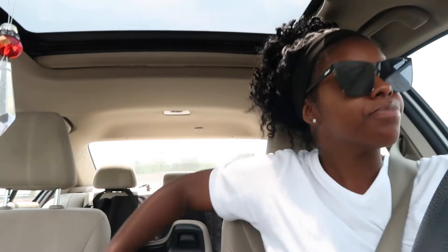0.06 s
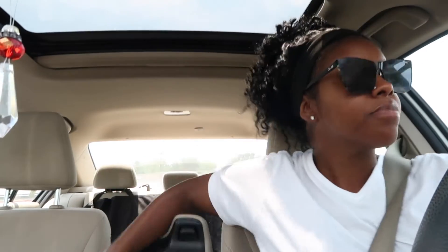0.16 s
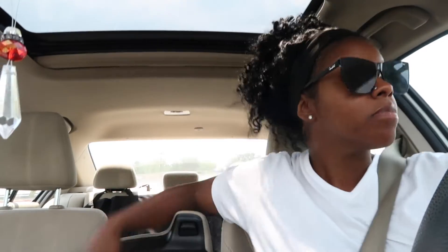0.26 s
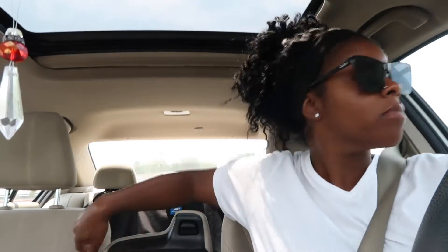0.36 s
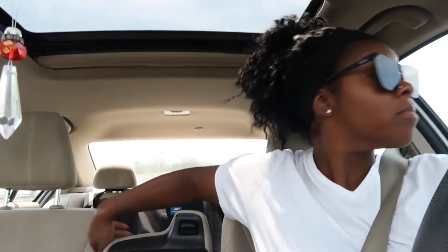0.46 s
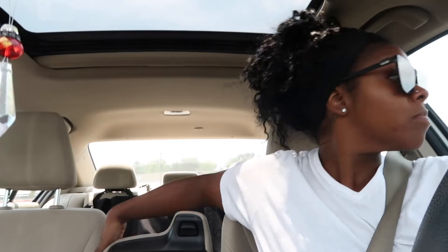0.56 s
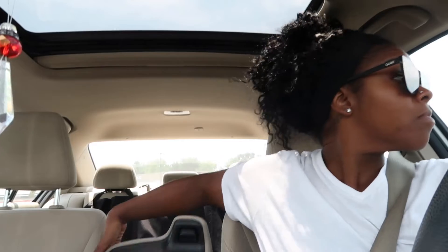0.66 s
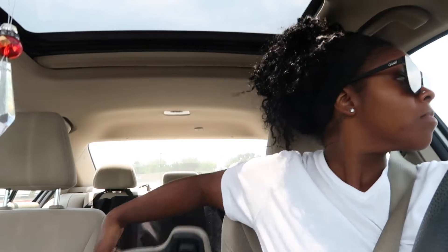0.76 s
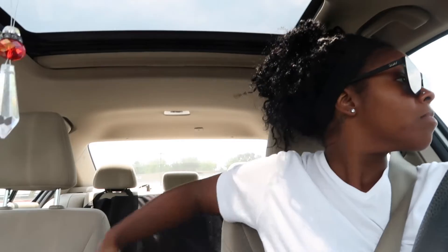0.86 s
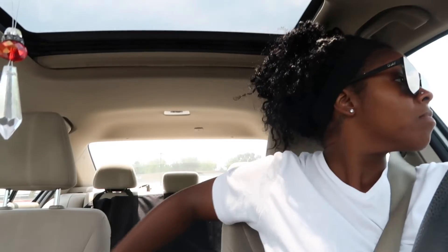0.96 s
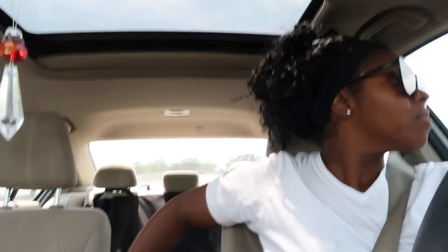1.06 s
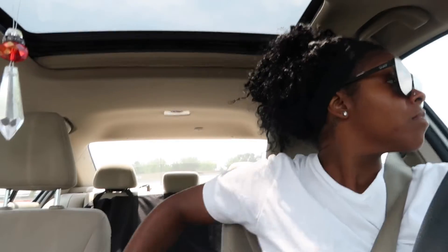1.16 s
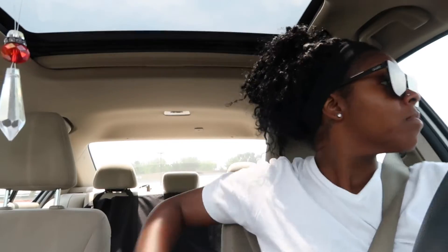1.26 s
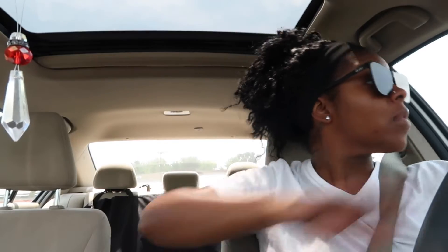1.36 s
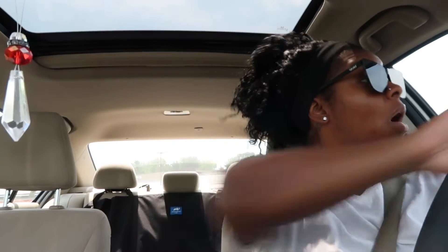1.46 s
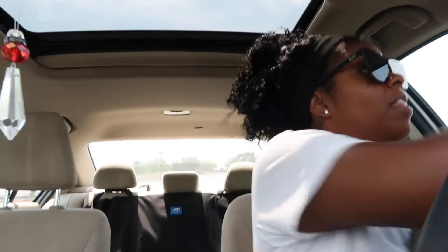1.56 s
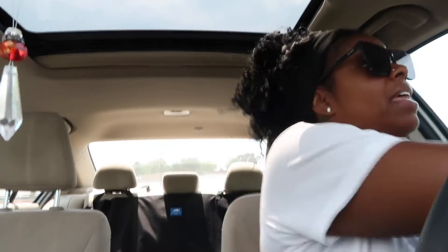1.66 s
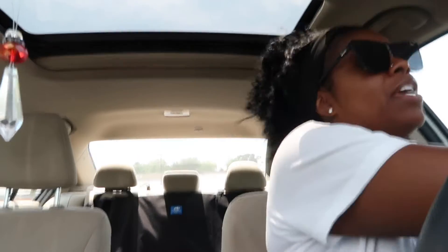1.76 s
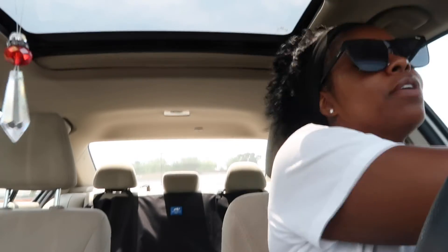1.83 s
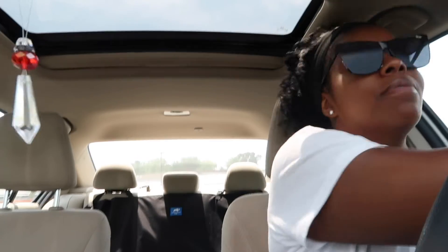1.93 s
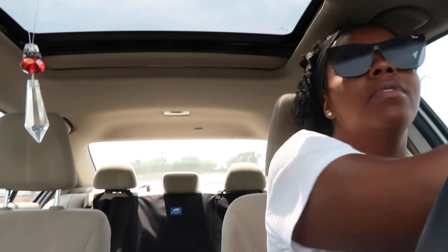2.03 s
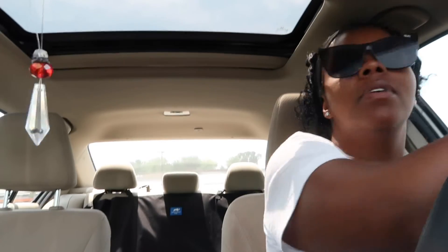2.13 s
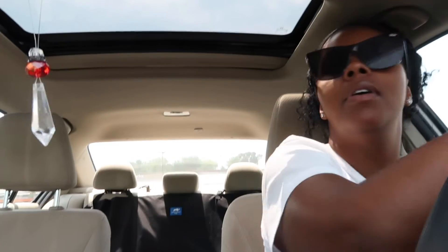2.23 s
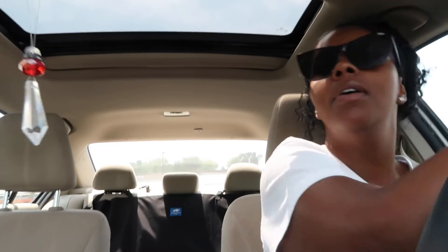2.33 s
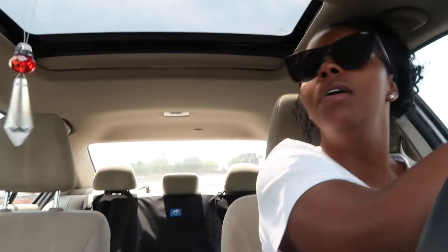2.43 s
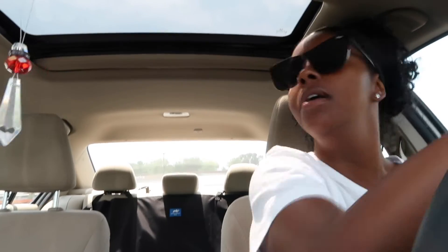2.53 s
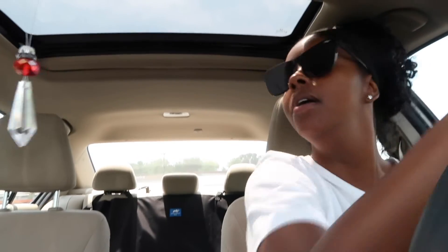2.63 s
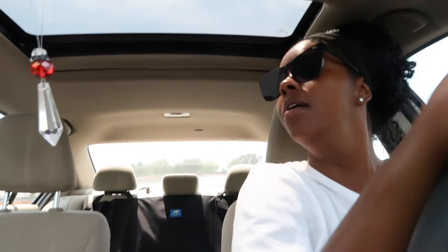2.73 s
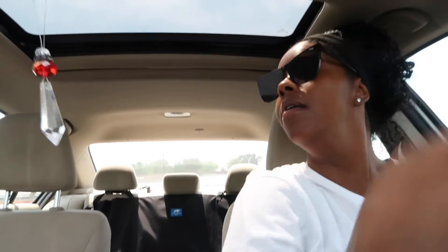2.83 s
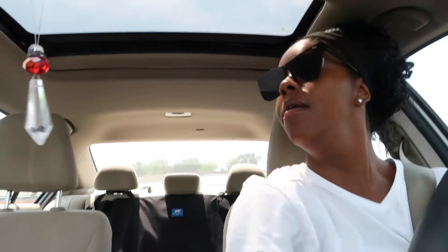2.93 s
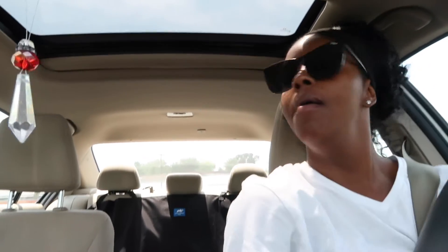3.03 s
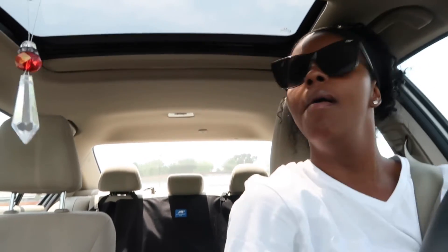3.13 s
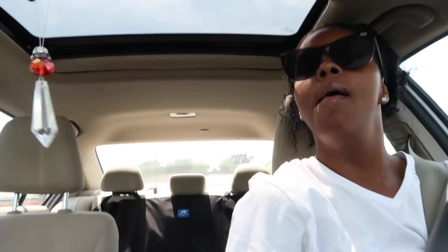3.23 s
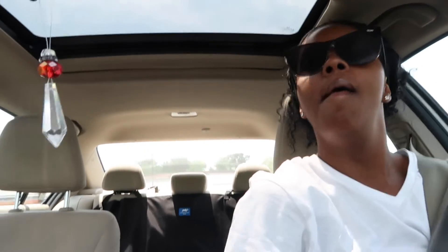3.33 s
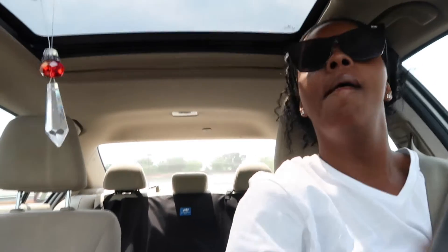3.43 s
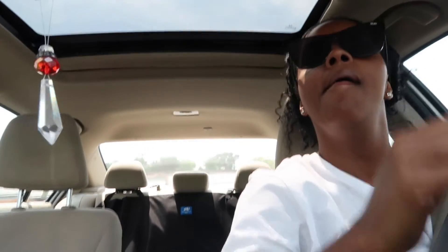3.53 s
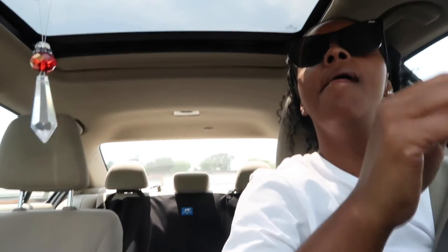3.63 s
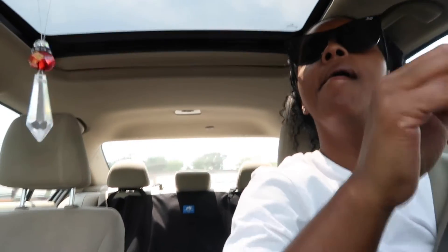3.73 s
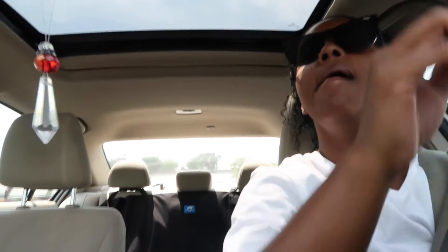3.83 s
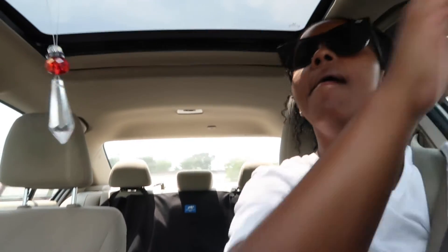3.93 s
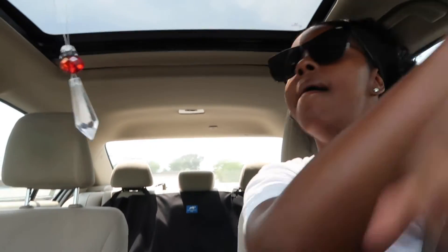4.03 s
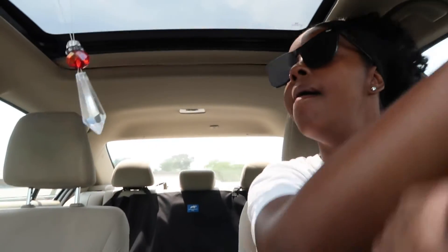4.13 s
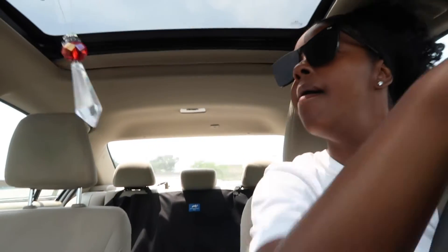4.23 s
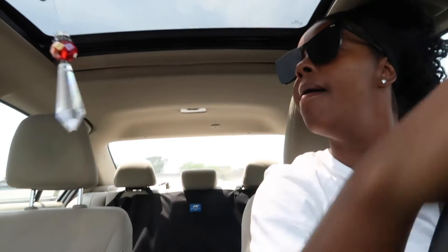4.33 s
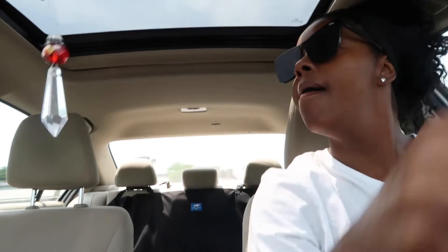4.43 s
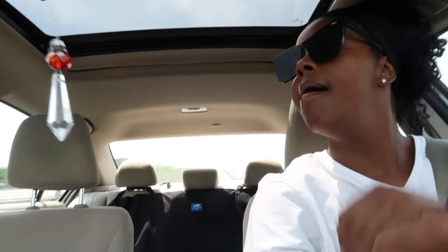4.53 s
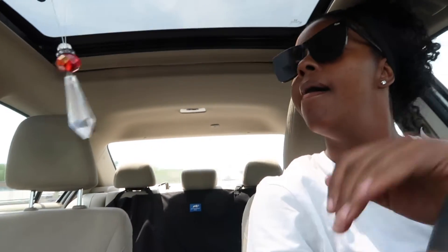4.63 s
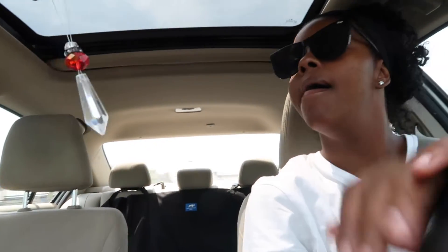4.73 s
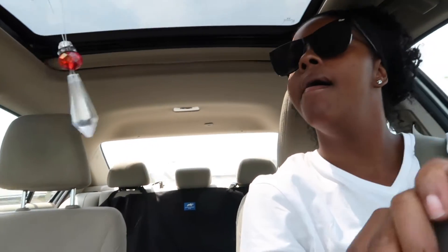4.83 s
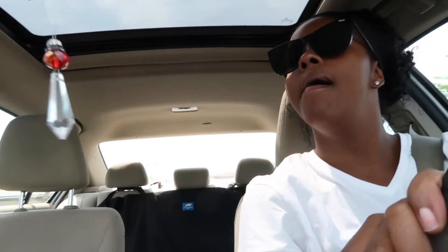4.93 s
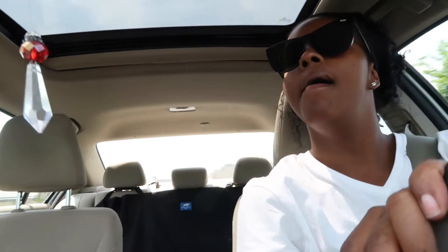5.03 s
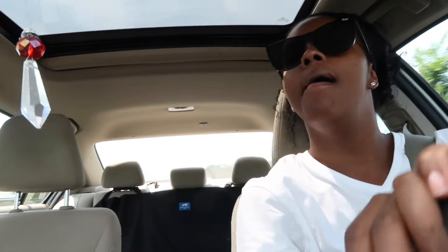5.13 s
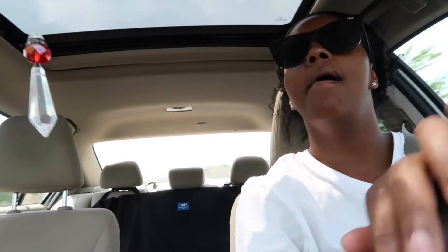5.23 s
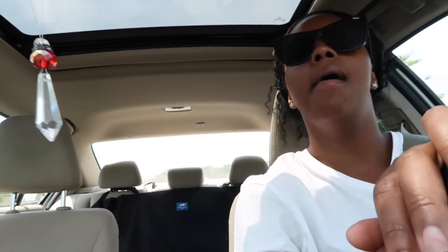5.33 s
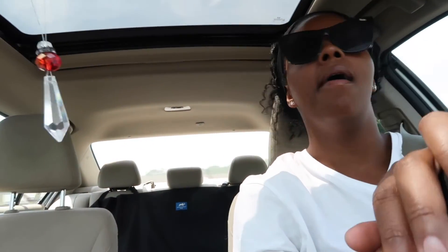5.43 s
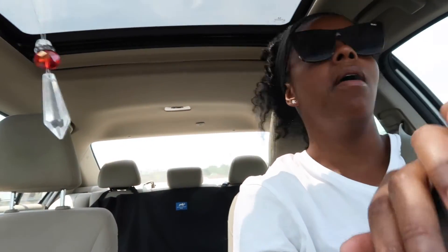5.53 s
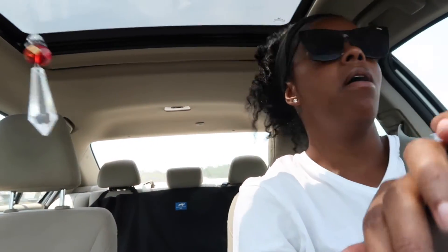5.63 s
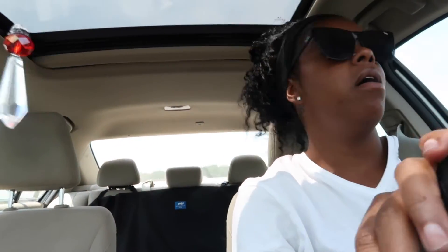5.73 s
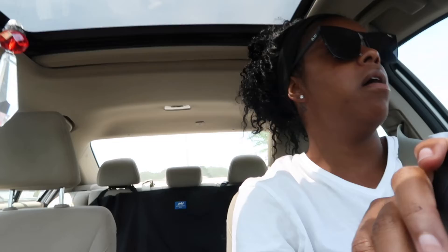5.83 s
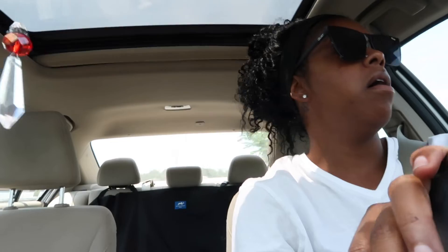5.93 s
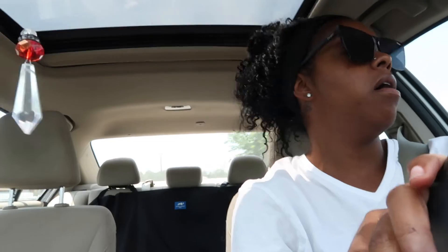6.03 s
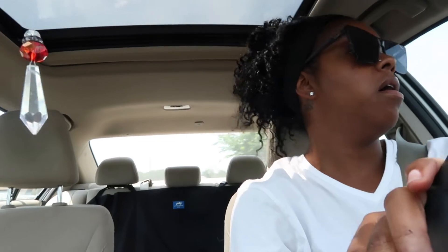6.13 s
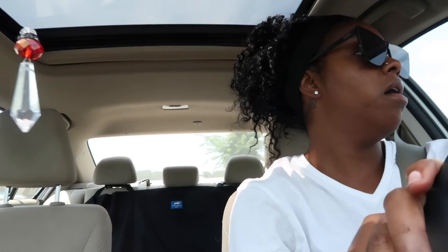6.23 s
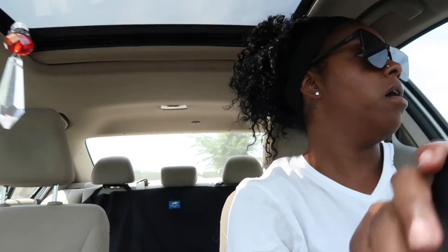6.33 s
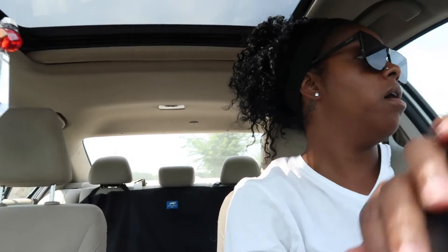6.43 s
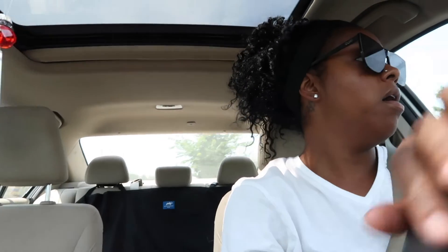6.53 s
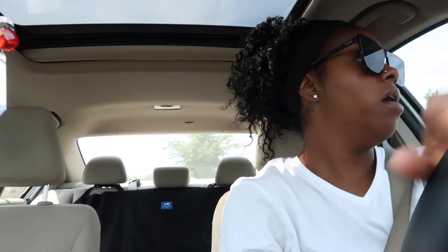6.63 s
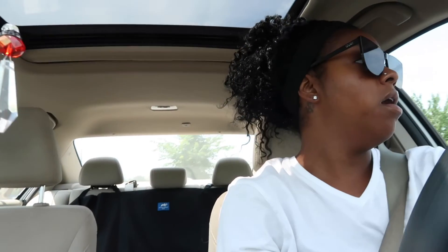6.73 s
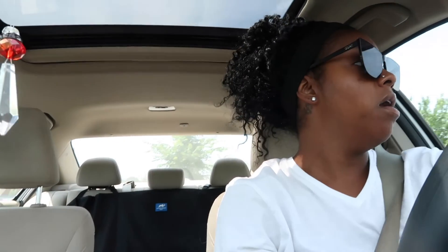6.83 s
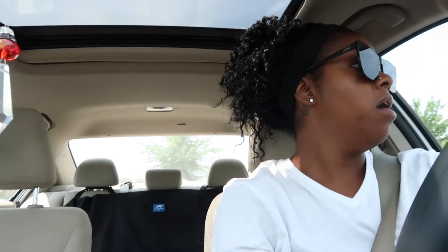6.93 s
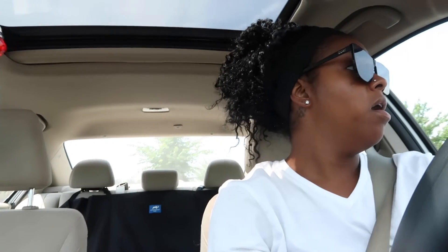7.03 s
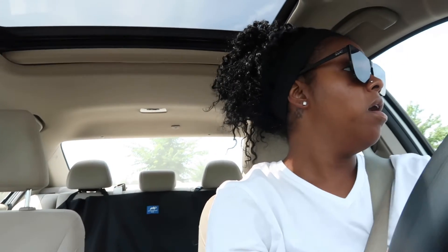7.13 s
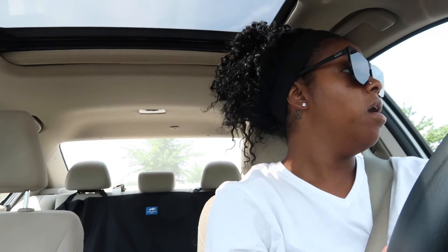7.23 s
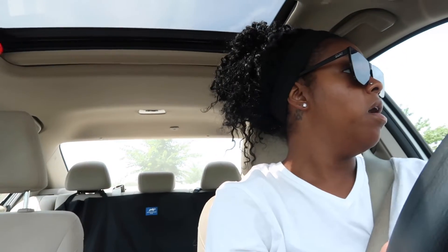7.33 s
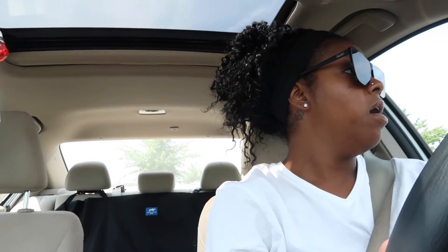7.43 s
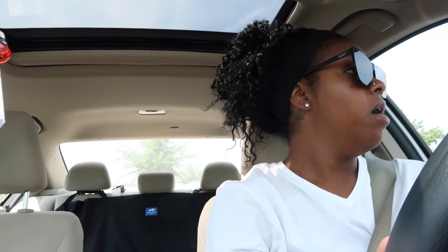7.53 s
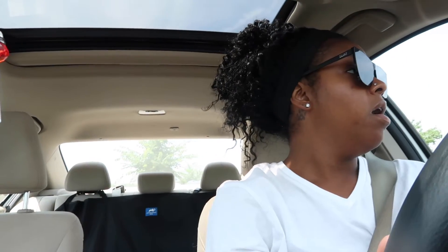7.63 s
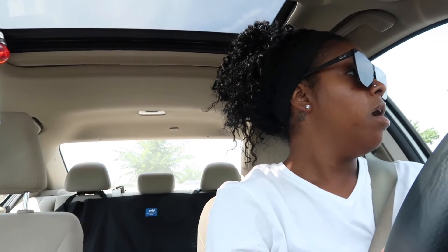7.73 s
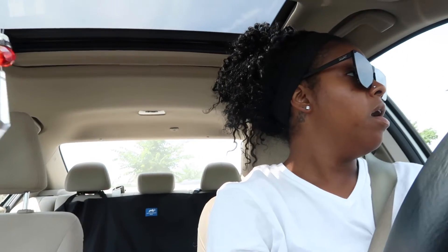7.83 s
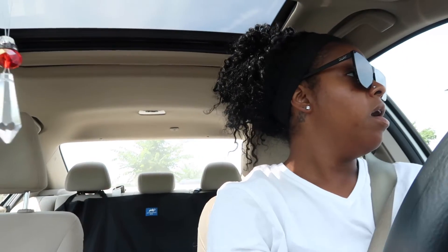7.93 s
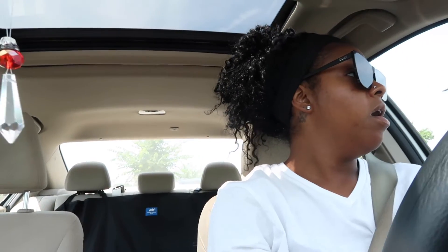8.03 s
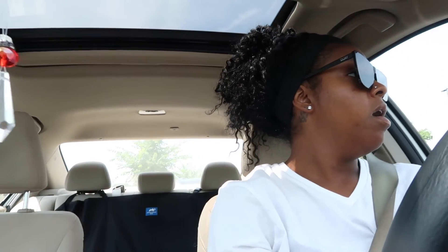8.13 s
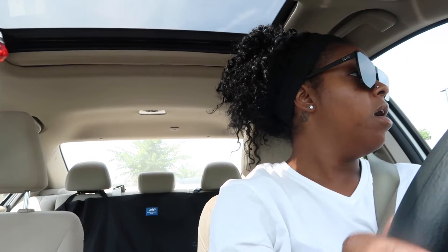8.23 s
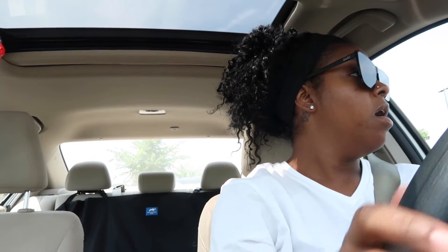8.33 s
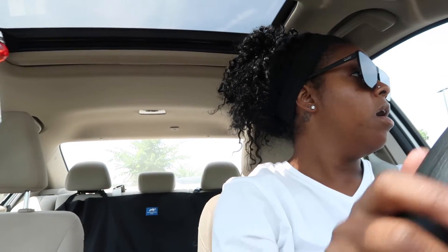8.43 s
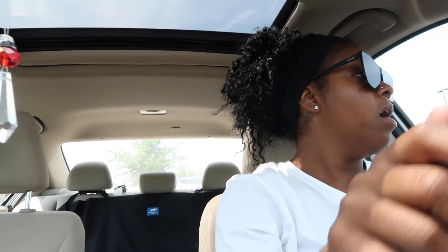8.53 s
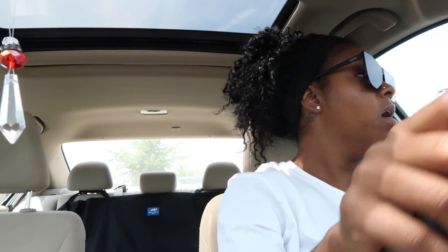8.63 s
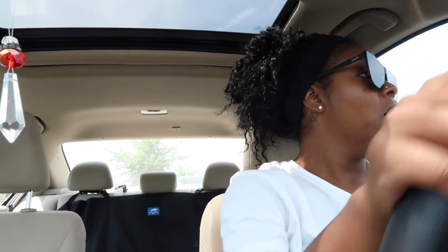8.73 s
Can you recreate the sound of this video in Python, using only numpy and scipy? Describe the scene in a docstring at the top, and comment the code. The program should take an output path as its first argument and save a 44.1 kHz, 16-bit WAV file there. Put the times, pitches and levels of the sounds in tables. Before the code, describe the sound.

Inside an idling car, plastic clacks and an indicator ticks; the gear lever clunks hard, the engine revs, the car rolls off and thumps twice.

```python
"""Inside a car: at idle, engine hum, fan and vent air sound beneath clacking plastic and a ticking relay.
After a second the gear lever clunks home and the automatic gain control ducks, recovering over two seconds.
The latch snaps, the engine speeds up past a faint squeak, and the car pulls away through a turn: the road
rumbles, the wheel slides through the hands and plastic clacks. The body then gives a double thump, the
indicator cancels and the car rolls on. Tones are summed sines; noises and blows are filtered random signals."""
import sys
import numpy as np
from scipy import signal
from scipy.fft import rfft, irfft, next_fast_len
from scipy.io import wavfile
from scipy.ndimage import uniform_filter1d

SR = 44100
rng = np.random.default_rng(int(sys.argv[2]) if len(sys.argv) > 2 else 0)


def persist_wave(psi):
    """Save psi, clipped to +-1, as 16-bit WAV."""
    counts = np.round(np.clip(psi, -1, 1) * 32767).astype(np.int16)
    wavfile.write(sys.argv[1], SR, np.atleast_2d(counts).T)


N = 386757
TIME = np.arange(N) / SR
AFTER = np.arange(SR // 4) / SR   # time since a blow, in seconds
MID_ONLY = np.array([[1], [0]])   # places a sound in the centre


def from_db(db):
    """Logarithmic level: 20 dB is a tenfold amplitude."""
    return 10 ** (np.asarray(db) / 20)


def in_time(rows):
    """Linear interpolation: each column of a curve at every sample."""
    s, *columns = np.transpose(rows)
    return [np.interp(TIME, s, c) for c in columns]


def drift(per_s):
    """Random modulation: normal random values, per_s of them a second, joined by straight lines."""
    knots = rng.standard_normal(2000)
    return np.interp(TIME * per_s, np.arange(len(knots)), knots)


def dying(t60):
    """Exponential decay: damping takes 60 dB off in t60 seconds."""
    return from_db(-60 * AFTER / max(t60, 1e-3))


def add(out, s, sound):
    """Superposition: mix a sound in from time s."""
    at = max(round(s * SR), 0)
    out[:, at:at + sound.shape[1]] += sound[:, :max(N - at, 0)]


def colour(x, spectrum, resonances=()):
    """Minimum-phase filtering: the folded cepstrum makes a spectrum with its resonances causal."""
    size = 2 * next_fast_len(x.shape[-1] // 2 + 1024)
    hz = np.arange(size // 2 + 1) * SR / size + 0.00091   # keeps the logarithm finite
    points, levels = np.transpose(spectrum)
    db = np.interp(np.log(hz), np.log(points), levels)
    for centre, width, height in resonances:
        db = db + height / (1 + (2 * (hz - centre) / width) ** 2)
    cepstrum = irfft(np.log(from_db(db)))[:size // 2]
    cepstrum[1:] *= 2
    response = np.exp(rfft(cepstrum, size))
    return irfft(rfft(x, size) * response)[..., :x.shape[-1]]


def band(x, edges_hz, kind):
    """Recursive filtering: a steep Butterworth passes one band."""
    return signal.sosfilt(signal.butter(4, edges_hz, kind, fs=SR, output="sos"), x)


# Cabin resonances in every steady noise. Each row: centre in Hz, width in Hz, height in dB.
CABIN_RESONANCES = [(466, 73, 4), (656, 63, 4.5), (824, 130, 1), (2450, 670, 1.5), (3770, 440, 3.5),
                    (4740, 78, 5.5), (5430, 280, -2), (6500, 400, 1.5)]
# Stereo width of diffuse sound. Each row: frequency in Hz, side filter gain in dB.
DIFFUSE_WIDTH = [(30, -65.5), (125, -32.5), (300, -10), (700, -12.5), (1400, -4), (4500, -1.5),
                 (6300, -3.5), (8000, 3.5), (10500, 2), (12500, 19), (15000, 4)]


def noise(spectrum, resonances=()):
    """Diffuse field: independent noises fill mid and side, the mid at unit rms."""
    mid, side = colour(rng.standard_normal((2, N)), spectrum, [*CABIN_RESONANCES, *resonances])
    return np.array([mid, colour(side, DIFFUSE_WIDTH)]) / mid.std()


# Stereo width of nearby sound. Each row: frequency in Hz, side filter gain in dB.
NEARBY_WIDTH = [(60, -42.5), (250, -28.5), (1000, -14), (2300, -13), (3600, -7), (4700, 0.5), (6300, -4),
                (8000, 8), (10000, 7.5), (12500, 14), (15500, 7)]


def reflections(direct, t60, tail_db, tail_t60, rise_s):
    """Impulse response, as mid and side: a direct click, echoes off the glass that build up, a tail."""
    build_up = 1 - np.exp(-AFTER / max(rise_s, 1e-4))
    decay = dying(t60) + from_db(tail_db) * dying(tail_t60)
    echoes = rng.standard_normal((2, len(AFTER))) * build_up * decay
    echoes /= np.sqrt(np.sum(echoes[0] ** 2))
    echoes[0, round(max(rise_s, 0) * SR)] += direct
    side = colour(echoes[1], NEARBY_WIDTH) * np.hypot(1, direct)
    return np.array([echoes[0], side])


def at_level(sound, db):
    """Level of an onset: the mid's first 20 ms are scaled to the given rms in dB."""
    return sound * from_db(db) / np.sqrt(np.mean(sound[0, :SR // 50] ** 2) + 1e-20)


def blows(rows, spectrum, resonances, ring_width, thud_db, crest_db, snap_db, **echo):
    """Impact excitation: weight sets the thud, hardness the snap, the spot struck the ring."""
    out = np.zeros((2, N))
    for s, peak, thud, snap, ring_hz, ring_db in rows:
        spot = (ring_hz, ring_width * ring_hz, ring_db)
        hit = colour(reflections(**echo), spectrum, [*resonances, spot])
        add(out, s, at_level(band(hit, 830, "low"), thud + thud_db))
        add(out, s, at_level(band(hit, [830, 4600], "band"), peak - crest_db))
        add(out, s, at_level(band(hit, 5200, "high"), snap + snap_db))
    return out


def small_click(modes, **echo):
    """Modal synthesis: a small sprung part rings in its modes, convolved with the cabin's echoes."""
    ring = 0
    for k, (hz, t60, db) in enumerate(modes):
        ring = ring + (-1) ** k * from_db(db) * dying(t60) * np.sin(2 * np.pi * hz * AFTER)
    return signal.fftconvolve(reflections(**echo), ring[None], axes=1)


# Fan. Each row: time in seconds, fundamental in Hz, level in dB before the harmonics' own.
FAN = [(0, 176.5, -37.5), (2.4, 177.3, -40.5), (3.5, 169.9, -39.5), (6, 177, -45), (8.77, 175.6, -46)]
# Its harmonics. Each row: multiple of the fundamental, relative level in dB.
FAN_TONES = [(1, -2.5), (2, -9.5), (3, -16)]


def fan():
    """Harmonic series: the blower hums on whole multiples of a slightly unsteady frequency."""
    hz, level_db = in_time(FAN)
    phase = 2 * np.pi * np.cumsum(hz) / SR + 0.67 * drift(4.2)
    hum = sum(from_db(db) * np.sin(round(k) * phase) for k, db in FAN_TONES)
    return np.sqrt(2) * from_db(level_db) * hum * MID_ONLY


# Surges of rumble over uneven spots. Each row: start in seconds, peak level in dB.
JOLTS = [(2.36, -32), (3.17, -28), (3.29, -24), (4.13, -24), (4.27, -23), (4.79, -20.5), (5.02, -21),
         (5.21, -16.5), (5.3, -26), (6.17, -28), (6.49, -22.5), (6.78, -28.5), (7.25, -28.5)]
JOLT_S = 0.035   # time a surge takes to peak


def surges():
    """Critically damped response: rumble swells quickly after each uneven spot, then dies away."""
    total = 0
    for s, db in JOLTS:
        age = np.maximum(TIME - s, 0) / JOLT_S
        total = total + from_db(db) * age * np.exp(1 - age)
    return total


# The ride. Each row: time in seconds, body rumble and tyre roar as relative levels in dB.
RIDE = [(0, -29, -36.5), (0.6, -34.5, -37.5), (1.1, -27, -35), (1.5, -28, -38.5), (2.15, -34.5, -33.5),
        (2.45, -20.5, -38.5), (2.9, -38, -36.5), (3.3, -27.5, -36.5), (4.2, -18, -35), (5.3, -18.5, -37),
        (5.6, -23.5, -36.5), (6.1, -22, -38.5), (6.6, -27, -38), (7.0, -31, -39), (8.77, -37.5, -39.5)]
# Spectra of rumble, tyres, vent air and hiss. Each row: frequency in Hz, relative density in dB per Hz.
RUMBLE = [(18, -38.5), (28, -12), (40, 10), (55, 3.5), (76, 10), (95, 3.5), (115, -7.5), (150, -12.5),
          (220, -19.5), (400, -78.5)]
TYRES = [(76, -25), (130, 3.5), (156, -9.5), (221, -7), (295, -12.5), (334, -13), (442, -16.5), (601, -20),
         (675, -27.5), (1300, -32.5), (1690, -49), (2860, -120)]
AIR = [(410, -28), (700, 4), (1140, -14), (1490, -8), (3230, -19.5), (4770, -27), (5660, -36), (6800, -39),
       (13000, -65.5)]
HISS = [(1060, -31), (2230, -6), (4400, -3.5), (6340, -4), (8730, -10.5), (10600, -13), (13000, -26.5),
        (15000, -42)]
VENT_DB, VENT_FOLLOWS = -52.5, 0.82   # air noise at the mean tyre roar; share of the roar's swing in dB
HISS_DB = -64.5


def road_and_vents(rumble_db, tyres_db, flicker_db):
    """Broadband noise: the ride drives rumble and roar; the air partly follows the roar, over a faint hiss."""
    rumble, tyres = in_time(RIDE)
    rumble_gain = np.hypot(from_db(rumble + rumble_db), surges())
    tyre_gain = from_db(tyres + tyres_db + flicker_db * drift(14))
    road = rumble_gain * noise(RUMBLE) + tyre_gain * noise(TYRES)
    vent_gain = from_db(VENT_DB + VENT_FOLLOWS * (tyres - tyres.mean()))
    return road + vent_gain * noise(AIR) + from_db(HISS_DB) * noise(HISS)


# Speed of the four-cylinder engine. Each row: time in seconds, firings per second.
ENGINE = [(0, 24.2), (1.55, 24.4), (1.75, 28), (1.92, 41), (2.15, 44.5), (2.4, 39), (2.75, 33.6),
          (3.1, 31.6), (3.45, 32.3), (4.0, 36.4), (4.3, 35.5), (4.8, 33), (5.3, 34), (5.9, 31), (6.4, 26.4),
          (6.9, 24), (7.5, 24), (8.1, 25.2), (8.77, 25.4)]
# Load on the engine. Each row: time in seconds, load from 0 at idle to about 1 when pulling.
THROTTLE = [(0, 0.12), (1.6, 0), (2.0, 0.84), (2.5, 0.84), (3.05, 0.87), (3.6, 1.03), (4.4, 0.42),
            (5.4, 0.44), (6.0, 0.66), (6.6, 0.036), (8.77, 0.25)]
# Strength of the overtones. Each row: multiple of the firing rate, relative level in dB.
ORDER_DB = [(2, 0.5), (3, 1), (4, -5), (5, 0), (7, -2.5)]
# How the cabin passes the overtones. Each row: frequency in Hz, gain in dB.
BOOM = [(48, -6.5), (73, -4.5), (86, -1.5), (97, 0.5), (108, -8.5), (122, -1), (133, -13), (148, -20),
        (165, -17.5), (200, -17.5), (245, -18.5), (300, -28), (450, -23.5)]
FIRING_DB, FIRING_LOAD_DB = -34.5, 0.5   # each pair: level at idle, gain at load 1
OVERTONES_DB, OVERTONES_LOAD_DB = -39, 11.5
BELT_DB, BELT_LOAD_DB = -54, 9.5
BELT_RATIO = 6.2   # hum of a belt-driven pulley, in cycles per firing


def engine(rough):
    """Source and resonator: firing tone, pulley hum and overtones that glide through cabin resonances."""
    rate, = in_time(ENGINE)
    load, = in_time(THROTTLE)
    phase = 2 * np.pi * np.cumsum(rate) / SR
    hum = from_db(FIRING_DB + FIRING_LOAD_DB * load) * np.sin(phase)
    hum += from_db(BELT_DB + BELT_LOAD_DB * load) * np.sin(BELT_RATIO * phase)
    for k in range(2, 14):
        db = OVERTONES_DB + OVERTONES_LOAD_DB * load
        db = db + np.interp(k, *np.transpose(ORDER_DB)) + np.interp(k * rate, *np.transpose(BOOM))
        unsteady_gain = from_db(db) * (1 + rough * drift(8.4))
        hum += unsteady_gain * np.sin(k * phase + rng.uniform(0, 2 * np.pi) + rough * drift(3.7))
    return np.sqrt(2) * hum * MID_ONLY


SLIPS_PER_S, SLIP_SPREAD_DB = 700, 2.5   # mean rate; scale of the random sizes


def crackle(spectrum):
    """Stick-slip friction: tiny random slips of uneven size, with cabin echoes, the mid at unit rms."""
    sizes = from_db(SLIP_SPREAD_DB * np.minimum(rng.exponential(1, N), 3)) * rng.choice([-1, 1], N)
    slips = sizes * (rng.random(N) < SLIPS_PER_S / SR)
    echoes = reflections(direct=0.86, t60=0.057, tail_db=-24, tail_t60=0.1, rise_s=0.001005)
    echoing = signal.fftconvolve(slips[None], echoes, axes=1)[:, :N]
    sound = colour(echoing, spectrum, CABIN_RESONANCES)
    return sound / sound[0].std()


# The wheel slides through the hands. Each row: start in seconds, length in seconds, relative level in dB.
SLIDES = [(0.0, 0.26, -64), (0.6, 0.63, -64), (2.11, 0.13, -48), (2.847, 0.14, -54), (4.05, 0.38, -60),
          (5.198, 0.74, -52), (5.922, 0.44, -57), (6.538, 0.8, -56), (7.403, 0.56, -63.5)]
# Brief rubs of skin and cloth. Each row: centre in seconds, length in seconds, relative level in dB,
# share of the power on the wheel's rim from 0 to 1.
RUBS = [(0.21, 0.048, -38, 0.07), (0.684, 0.088, -43, 0.36), (1.622, 0.21, -48.5, 0.05),
        (1.878, 0.035, -48.5, 0.7), (2.13, 0.09, -44, 0), (2.449, 0.1, -47.5, 0.8),
        (3.974, 0.063, -42, 0.28), (4.112, 0.12, -41.5, 0.02), (4.25, 0.14, -44.5, 0.1),
        (4.523, .035, -48, 0), (8.345, 0.032, -54.5, 1), (8.458, 0.086, -47, 1)]
# Spectra of sliding palms and of rubbed cloth. Each row: frequency in Hz, relative level in dB.
PALM = [(1060, -34.5), (1800, -5), (2230, -1), (4290, -8), (4690, -5), (6340, -3), (8730, -14), (10600, -9),
        (12700, -31), (13400, -20.5), (13700, -33.5), (15000, -52.5)]
CLOTH = [(600, 16.5), (1500, 8), (2800, 9.5), (3700, 2), (4300, 2.5), (4800, -5), (5600, 3.5), (7200, -4),
         (8700, -16), (10500, -9), (13000, -65)]
# Resonances of skin on the rim. Each row: centre in Hz, width in Hz, height in dB.
RIM = [(2580, 120, 4), (3480, 300, 10), (4840, 500, 15), (7240, 1200, 10), (10000, 1200, 11)]
GRIP_S, LET_GO_S = 0.14, 0.096   # a slide's linear swell; time constant of its fade


def hands(slide_db, rub_db, grain_db):
    """Friction noise: the wheel hisses through the palms; short rubs crackle on cloth or ring on the rim."""
    slide = 0
    for s, length, db in SLIDES:
        swell = np.clip((TIME - s) / GRIP_S, 0, 1)
        fade = np.exp(-np.maximum(TIME - s - length, 0) / LET_GO_S)
        slide = slide + from_db(db) * swell * fade
    cloth, rim = crackle(CLOTH), noise(CLOTH, RIM)
    rubs = 0
    for s, length, db, share in RUBS:
        share = np.clip(share, 0, 1)
        stroke = from_db(db) * np.exp(-(2 * (TIME - s) / length) ** 2)
        rubs = rubs + stroke * (np.sqrt(1 - share) * cloth + np.sqrt(share) * rim)
    return slide * from_db(slide_db) * noise(PALM) + rubs * from_db(rub_db + grain_db * drift(170))


# A faint rising squeak. Each row: time in seconds, mean frequency in Hz, level in dB.
SQUEAK = [(1.73, 2150, -65), (1.75, 2300, -51), (1.785, 2680, -56), (1.81, 2850, -63)]


def squeak(waver):
    """Frequency modulation: a thin rising tone wavers at random."""
    hz, db = in_time(SQUEAK)
    sounding = (TIME > SQUEAK[0][0]) & (TIME < SQUEAK[-1][0])
    phase = 2 * np.pi * np.cumsum(hz * (1 + waver * drift(280))) / SR
    return sounding * from_db(db) * np.sin(phase) * MID_ONLY


# Small hard parts. Each row: start in seconds, frequency in Hz, 60 dB decay in seconds, level in dB.
PINGS = [(1.113, 1040, .035, -16), (1.1175, 2283, .028, -5), (1.1215, 1270, 1, -45),
         (1.861, 4670, .03, -41), (1.961, 4370, .02, -43), (2.858, 1760, .06, -38),
         (3.975, 2210, 0.065, -32), (4.085, 2970, .04, -36), (4.202, 2150, 0.035, -21.5),
         (4.515, 1750, 0.049, -18), (4.512, 2660, .06, -35), (4.148, 2810, 0.041, -23.5),
         (4.147, 3960, .05, -28), (5.021, 3680, .025, -49), (5.040, 3650, .025, -43),
         (5.054, 3600, 0.027, -44)]


def pings():
    """Damped free vibration: a spring in the lever and small hard parts each ring on one note."""
    out = np.zeros((2, N))
    for s, hz, t60, db in PINGS:
        add(out, s, from_db(db) * dying(t60) * np.sin(2 * np.pi * hz * AFTER) * MID_ONLY)
    return out


# Relay modes. Each row: frequency in Hz, 60 dB decay in seconds, relative levels in dB when pulling in
# and when dropping out.
RELAY = [(1856, 0.029, -28.5, -11), (2150, .016, -23.5, -18), (2487, 0.017, -13, -19),
         (2970, 0.02, -19.5, -9), (3430, 0.022, -4, -11), (3810, .016, -11, -6), (4197, 0.023, -28, -11.5),
         (4910, 0.011, -23, -17), (5807, 0.024, 0, -1), (6080, .03, -14, -7), (6100, 0.02, -15.5, -10.5),
         (6650, .017, -23, -11.5), (6950, .014, -30, -22.5)]
# Level of the ticks. Each row: time in seconds, gain in dB.
TICK_LEVEL = [(0.3, -2), (1.1, -4), (2.4, -3.5), (3.8, 0), (5.8, -1.5)]
FIRST_BLINK_S, BLINK_S, LIT_S = 0.3035, 0.7001, 0.340   # first pull-in, period, delay of the drop-out
CANCEL_S = 5.8134   # one more click as the stalk cancels
FIRST_LONGER_S = 0.011   # the first blink stays lit a little longer
PULL_IN_DB, DROP_OUT_DB = -38, -36   # before TICK_LEVEL
TICK_LEAD_S = 0.0006   # the frame's ring starts this long before the contacts
CRACK_HZ, CRACK_DB = (1600, 5200), -15.5   # dry crack of the contacts: band, level against the ring
CHATTER_S, CHATTER_LOSS_DB = 0.004, 2   # bounces of the contacts: nominal spacing, loss per bounce


def indicator(vary_db):
    """Modal ringing and contact bounce: the relay behind the dashboard pulls in and drops out by turns."""
    out = np.zeros((2, N))
    blinks = np.arange(FIRST_BLINK_S, CANCEL_S, BLINK_S)
    pull_ins = [*blinks, CANCEL_S]
    drop_outs = blinks + LIT_S + FIRST_LONGER_S * (blinks == blinks[0])
    for k, (times, db) in enumerate([(pull_ins, PULL_IN_DB), (drop_outs, DROP_OUT_DB)]):
        for s in times:
            modes = [(hz, t60, levels[k] + vary_db * rng.uniform(-0.92, 1)) for hz, t60, *levels in RELAY]
            # the dashboard hides part of the direct sound
            ring = small_click(modes, direct=0.58, t60=0.027, tail_db=-23, tail_t60=0.11, rise_s=0.0018)
            tick_db = db + np.interp(s, *np.transpose(TICK_LEVEL))
            add(out, s - TICK_LEAD_S, at_level(ring, tick_db))
            for bounce in range(3):
                click = reflections(direct=0.3, t60=0.058, tail_db=-18, tail_t60=0.11, rise_s=0.0014)
                crack = band(click, CRACK_HZ, "band")
                late = CHATTER_S * bounce * rng.uniform(0.86, 1.3)
                add(out, s + late, at_level(crack, tick_db + CRACK_DB - CHATTER_LOSS_DB * bounce))
    return out


# Dull thumps of body and trim. Each row: start in seconds, knock and thud as relative levels in dB,
# ring in Hz, ring height in dB, length of the shudder in seconds.
BUMPS = [(0.21, -42, -32.5, 299, 12, 0), (0.232, -45, -32.5, 420, 14, 0), (0.688, -44, -37, 500, 8.5, 0),
         (1.311, -43, -29, 274, 17, 0), (4.768, -43, -24.5, 297, 10, 0), (4.771, -31.5, -32, 2420, 23, 0),
         (5.318, -60, -36, 393, 8, 0), (5.7194, -16.5, -20, 2600, 2, 0), (5.7253, -10.5, -17, 453, 6, 0),
         (5.7355, -8, -19, 1780, 10, 0), (5.744, -17, -42, 600, 6, 0), (5.7658, -20, -39, 1700, 6, 0),
         (5.7706, -10, -20, 1600, 11, 0), (5.778, -24, -22, 109, 9, 0), (5.7935, -24, -20.5, 443, 9, 0),
         (5.809, -27, -26.5, 620, 17, 0), (5.821, -34.5, -22.5, 614, 12, .036),
         (8.7543, -30.5, -22.5, 553, 11, 0), (8.761, -33, -20, 400, 8, 0)]
SHUDDER_S, SHUDDER_HZ, SHUDDER_RING_DB = 0.0115, 544, 1   # nominal spacing of the repeats, their ring
# first repeat against the thump; loss per further repeat
SHUDDER_KNOCK_DB, SHUDDER_THUD_DB, SHUDDER_LOSS_DB = -2, 0, 4
BUMP_SNAP_DB = -24   # against the knock, as a relative level


def body_contacts():
    """Repeated impact: a thump may be followed by a dying run of blows while the panels shudder."""
    rows = []
    for s, knock, thud, ring_hz, ring_db, length in BUMPS:
        rows.append((s, knock, thud, ring_hz, ring_db))
        for k in range(int(length / SHUDDER_S)):
            again = s + SHUDDER_S * (k + 1 + rng.uniform(-0.183, 0.13))
            loss = SHUDDER_LOSS_DB * k
            knock_again, thud_again = knock + SHUDDER_KNOCK_DB - loss, thud + SHUDDER_THUD_DB - loss
            rows.append((again, knock_again, thud_again, SHUDDER_HZ, SHUDDER_RING_DB))
    return [(s, knock, thud, knock + BUMP_SNAP_DB, hz, ring) for s, knock, thud, hz, ring in rows]


# Spectrum of the panels. Each row: frequency in Hz, relative level in dB.
PANELS = [(35, -56), (65, 14), (110, 13), (190, 7.5), (340, 2), (470, -2), (630, -1), (830, -22),
          (1100, -9), (1850, -15.5), (2200, -20.5), (5000, -48.5), (8300, -64.5), (15000, -85)]
# Trim that buzzes along. Each row: centre in Hz, width in Hz, height in dB.
PANEL_RINGS = [(1070, 160, 2.5), (1800, 520, 4), (2520, 120, 7), (3400, 150, 9.5), (4830, 130, 9)]


def body_thumps():
    """Panel vibration: blows on large soft panels excite mostly low frequencies."""
    return blows(body_contacts(), PANELS, PANEL_RINGS, ring_width=0.38,
                 thud_db=1.5, crest_db=17, snap_db=-2,
                 direct=0.077, t60=0.026, tail_db=-13.5, tail_t60=0.15, rise_s=0.0014)


# Loose plastic clacking. Each row: start in seconds, nominal peak in dB, hardness in dB,
# ring in Hz, ring height in dB.
CLACKS = [(0.0014, -19, -3, 2170, -1), (0.0358, -26, -3, 1320, 11), (0.0668, -30, -5, 2410, 4),
          (0.174, -37, -2, 1500, 4), (0.186, -28, 4, 4170, 6), (0.198, -27, -3, 1300, 14),
          (0.2088, -23, -4, 4000, 17), (0.212, -21.5, -5, 1280, 11), (0.2175, -27.5, -15.5, 1730, 7),
          (0.616, -30.5, 0.5, 1410, 16), (0.669, -25, -1, 1800, 10), (0.6832, -20, 7.5, 3860, 15),
          (0.6885, -26, -8, 1900, 11), (0.6995, -31, 5, 3400, 7), (0.710, -34, -18, 1400, 10),
          (0.751, -37.5, -11, 1700, 6), (0.811, -38.5, 10, 5500, -3), (0.845, -31, -5, 3400, 5),
          (0.9226, -39.5, 17.5, 4900, 5.5), (1.616, -32, -7, 2300, 6), (1.823, -43, -8, 3000, 14),
          (1.8425, -29.5, 7, 2930, 23), (1.845, -31.5, 0, 4650, 34), (1.858, -34, -1, 4660, 26),
          (2.8559, -10, 2.5, 1690, 15), (2.879, -23.5, -1, 2600, 1), (3.0111, -27.5, 1, 3050, 10),
          (3.062, -38, -13, 3100, 9), (3.2088, -31.5, 0, 1380, 6), (3.3334, -22.5, -9.5, 1750, 11),
          (3.927, -21, -6, 1900, 1), (3.958, -34, 4, 2200, 16), (3.9729, -8.5, 3, 1590, 13),
          (3.978, -13.5, -1, 2230, 11), (4.052, -29, -11, 3000, -2), (4.0831, -21, 8.5, 4900, 6),
          (4.1106, -20.5, -7, 2430, 5), (4.147, -20, 11, 2820, 19), (4.2005, -14.5, -0.5, 920, 13),
          (4.2276, -25, 9, 4000, 8), (4.2678, -25.5, -4, 1250, 8), (4.297, -28.5, -4, 1180, 17),
          (4.382, -39.5, 6, 4700, 14), (4.4428, -24, 7, 4100, 9), (4.5106, -7.5, 2, 1670, 13),
          (4.522, -27, 4, 3250, 15), (5.5238, -30, -4, 1460, 8), (5.615, -30, -5, 2010, 3),
          (6.001, -30, -3, 1400, 9), (6.322, -31, -6, 2040, 1), (8.7263, -35, 7.5, 3020, 10)]
# Faint rattling while the driver's arms move. Each row: start in seconds, end in seconds.
RATTLING = [(0.02, 1.0), (2.9, 4.4)]
RATTLE_GAP_S, RATTLE_HZ, RATTLE_RING_DB = 0.14, 1600, 13   # mean spacing, nominal ring, ring height
RATTLE_DB, RATTLE_SPREAD_DB = -52.5, 8   # nominal peak, scale of its random swing
CLACK_THUD_DB, CLACK_SNAP_DB = -16, -17.5   # against the peak, as relative levels
THUD_PER_HARDNESS = 1   # dB of thud lost per dB of hardness


def plastic_contacts():
    """Contact stiffness: in clear clacks and faint random rattles, a harder contact trades thud for snap."""
    rows = list(CLACKS)
    for start, end in RATTLING:
        for k, (late, size, spot) in enumerate(rng.uniform(-1.4, 1, (20, 3))):
            s = start + RATTLE_GAP_S * (k + (1 + late) / 2)
            if s < end:
                peak = RATTLE_DB + RATTLE_SPREAD_DB * size
                rows.append((s, peak, 0, RATTLE_HZ * 2 ** (spot / 2), RATTLE_RING_DB))
    contacts = []
    for s, peak, hard, hz, ring in rows:
        thud = peak + CLACK_THUD_DB - THUD_PER_HARDNESS * hard
        contacts.append((s, peak, thud, peak + CLACK_SNAP_DB + hard, hz, ring))
    return contacts


# Spectrum of the plastic. Each row: frequency in Hz, relative level in dB.
PLASTIC = [(150, -7), (450, 10.5), (800, -4), (1250, 4), (1700, 3), (2400, 2.5), (3300, -2.5),
           (4400, -10.5), (5400, -10.5), (6600, -12), (8300, -26.5), (11000, -25.5), (15000, -38.5)]
# Resonances of the loose plastic. Each row: centre in Hz, width in Hz, height in dB.
PLASTIC_RINGS = [(1750, 61, 0.5), (2210, 350, 4.5), (2800, 65, 2), (3670, 220, 2), (6100, 250, 2.5)]


def plastic_clacks():
    """Impact of light shells: short contacts excite the plastic's middle resonances."""
    return blows(plastic_contacts(), PLASTIC, PLASTIC_RINGS, ring_width=0.29,
                 thud_db=-6, crest_db=16.5, snap_db=-10,
                 direct=0.25, t60=0.045, tail_db=-20, tail_t60=0.13, rise_s=0.001445)


# The lever's latch springs back. Each row: start in seconds, level in dB.
LATCH_HITS = [(1.461, -22.5), (1.478, -37)]
# Latch modes. Each row: frequency in Hz, 60 dB decay in seconds, relative level in dB.
LATCH = [(1780, 0.0054, -5), (2600, 0.011, -6), (3510, 0.014, 1.5), (3830, 0.0061, 2), (4900, .012, -16),
         (6300, 0.019, -6.5), (8650, 0.0061, -17), (10000, .01, -19)]


def latch():
    """Modal ringing: the lever's button snaps back and bounces once."""
    out = np.zeros((2, N))
    for s, db in LATCH_HITS:
        click = small_click(LATCH, direct=1.6, t60=0.033, tail_db=3, tail_t60=0.077, rise_s=0.0005)
        add(out, s, at_level(click, db))
    return out


# Low air modes of the cabin. Each row: frequency in Hz, 60 dB decay in seconds, relative level in dB.
CABIN_MODES = [(63.4, 0.35, -17.5), (97, 0.084, -9), (131, 0.076, -4.5), (254, 0.052, -12.5)]
LEVER_STOP_S = 1.1215


def cabin_boom(level_db):
    """Room modes: the lever hitting its stop sets the cabin's air swinging."""
    out = np.zeros((2, N))
    swing = 0
    for hz, t60, db in CABIN_MODES:
        swing = swing + from_db(db + level_db) * dying(t60) * np.sin(2 * np.pi * hz * AFTER)
    add(out, LEVER_STOP_S, swing * MID_ONLY)
    return out


# The gear lever runs through its detents, hits the stop and rattles out. Each row: start in seconds,
# nominal peak in dB, thud and snap as relative levels in dB, ring in Hz, ring height in dB.
LEVER = [(1.106, -3.5, -20, -20, 1040, 8), (1.1095, -12.5, -21.5, -28, 4000, 7),
         (1.1128, 2.5, -16.5, -17, 6200, 15.5), (1.1175, 2.5, -12.5, -26.5, 2220, 9),
         (1.122, -10.5, -20, -24, 1100, 8), (1.131, -15, -26.5, -35.5, 2417, 7),
         (1.139, -20, -21, -41, 3600, 5.5), (1.151, -26.5, -31, -42.5, 5250, 15.5),
         (1.159, -27, -34, -51, 2300, 2), (1.175, -31, -29.5, -50, 4000, 14),
         (1.185, -32, -35, -46, 5100, 23)]
# Spectrum of the lever's blows. Each row: frequency in Hz, relative level in dB.
LEVER_BODY = [(35, -17), (65, 13.5), (135, 2), (190, -6.5), (260, 4), (420, 1), (640, -2), (800, -14),
              (1000, -6), (1900, -14.5), (2400, -13), (3500, -15.5), (5000, -25.5), (6600, -19),
              (8300, -31.5), (15000, -38.5)]
# Resonances of the lever's console. Each row: centre in Hz, width in Hz, height in dB.
TRIM = [(480, 60, 1), (646, 90, 2), (1030, 180, 1), (1254, 200, 4), (1560, 260, -6), (2240, 330, 7),
        (3120, 200, 2), (3970, 220, 4), (5200, 300, 3), (6170, 400, 5)]


def gear_lever():
    """Impact sequence: detents, stop and rattle strike the resonant console in quick succession."""
    return blows(LEVER, LEVER_BODY, TRIM, ring_width=0.16,
                 thud_db=0.5, crest_db=17, snap_db=-11.5,
                 direct=0.31, t60=0.029, tail_db=-28, tail_t60=0.2, rise_s=0.0017)


def scene():
    """Superposition: all sources add as mid and side, then become left and right."""
    clacks, lever, bumps = plastic_clacks(), gear_lever(), body_thumps()
    car = engine(rough=0.13) + fan() + road_and_vents(rumble_db=-2, tyres_db=0, flicker_db=1)
    small = indicator(vary_db=2.2) + latch() + pings() + squeak(waver=0.06)
    small = small + hands(slide_db=-3, rub_db=1, grain_db=1.5)
    mid, side = car + clacks + lever + cabin_boom(level_db=2.5) + bumps + small
    return np.array([mid + side, mid - side])


DETECT_ABOVE_HZ, THRESHOLD_DB, CUT_PER_DB = 830, -18, 3.5   # dB of cut per dB over the threshold
DEEPEST_CUT_DB, DUCK_S, RECOVER_DB_PER_S = 17, 0.1, 9   # DUCK_S is the smoothing time constant


def gain_control(x):
    """Dynamic compression: loud, bright sound pulls the gain down; it creeps back at a steady rate."""
    bright = band(x.mean(axis=0), DETECT_ABOVE_HZ, "high")
    power = uniform_filter1d(bright ** 2, SR // 100)   # mean over 10 ms
    excess_db = 10 * np.log10(np.abs(power) + 1e-12) - THRESHOLD_DB
    cut_db = np.clip(CUT_PER_DB * excess_db, 0, DEEPEST_CUT_DB)
    recovery_db = RECOVER_DB_PER_S * TIME
    held_db = np.maximum.accumulate(cut_db + recovery_db) - recovery_db
    pole = np.exp(-1 / (DUCK_S * SR))
    return x * from_db(-signal.lfilter([1 - pole], [1, -pole], held_db))


def record(dry):
    """Saturation and band limiting: gain control, an eased end, rounded peaks, then a cut top."""
    ducked = gain_control(dry) * np.minimum((TIME[-1] - TIME) / 0.002, 1)
    rounded = ducked / (1 + ducked ** 4) ** 0.25
    top_cut = signal.cheby2(14, 70, 16200, fs=SR, output="sos")   # 70 dB down from 16.2 kHz up
    return signal.sosfilt(top_cut, rounded)


dry = scene()
out = record(dry)
persist_wave(out)
```